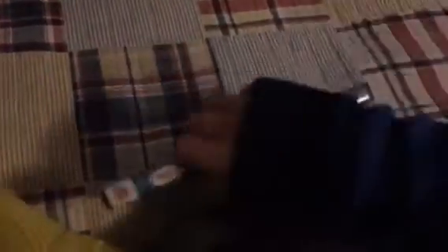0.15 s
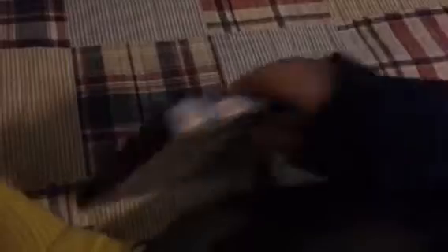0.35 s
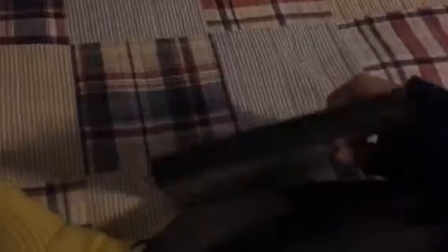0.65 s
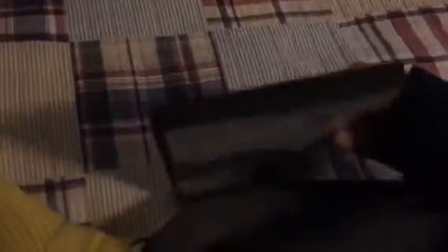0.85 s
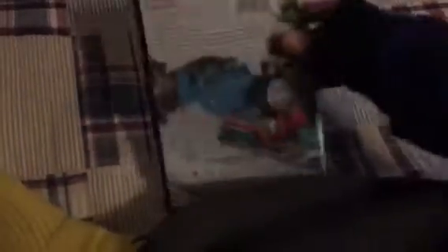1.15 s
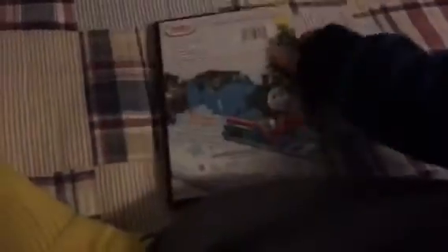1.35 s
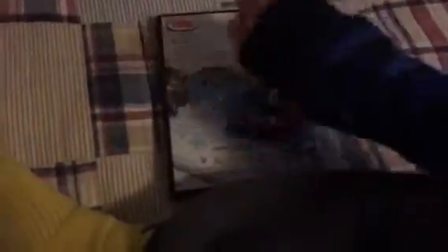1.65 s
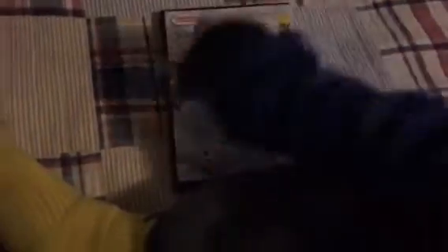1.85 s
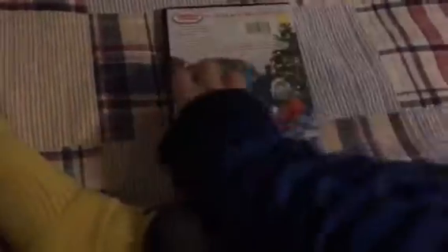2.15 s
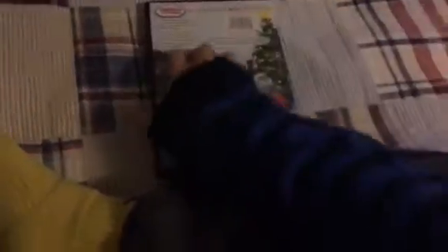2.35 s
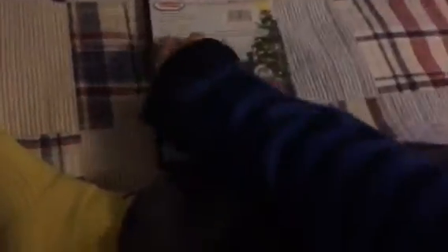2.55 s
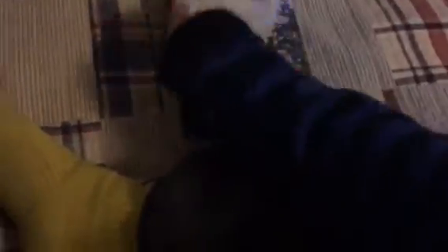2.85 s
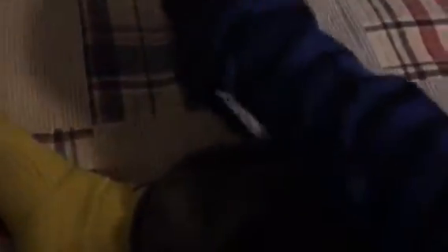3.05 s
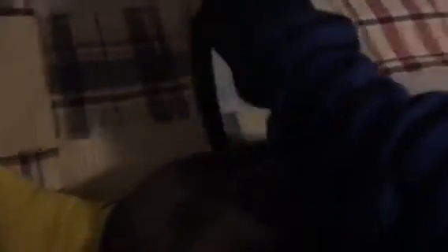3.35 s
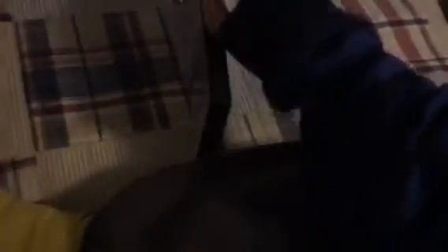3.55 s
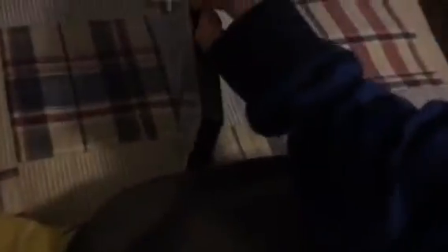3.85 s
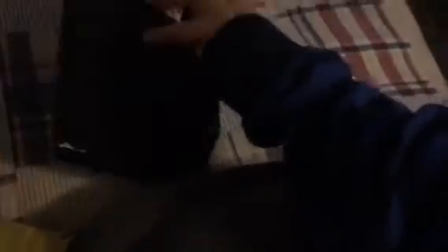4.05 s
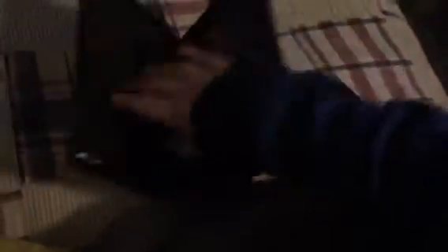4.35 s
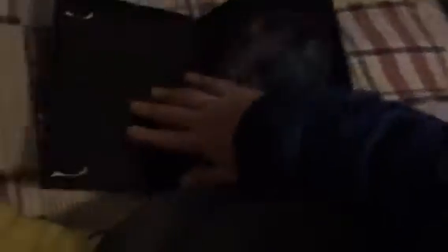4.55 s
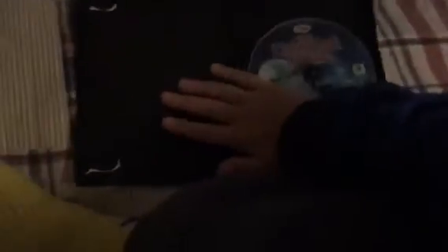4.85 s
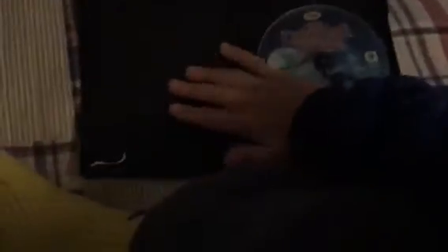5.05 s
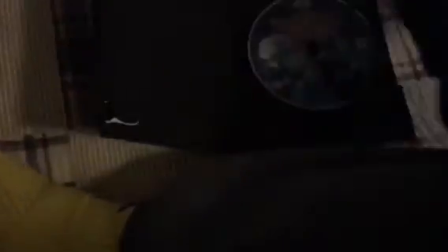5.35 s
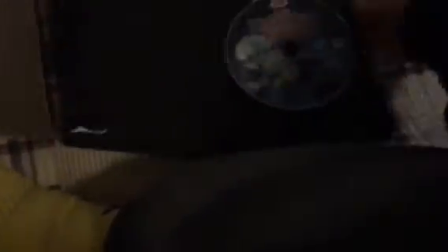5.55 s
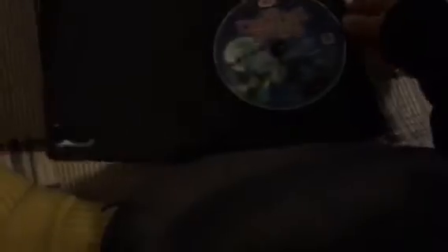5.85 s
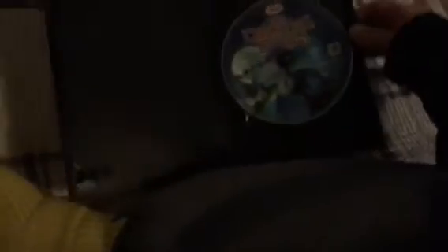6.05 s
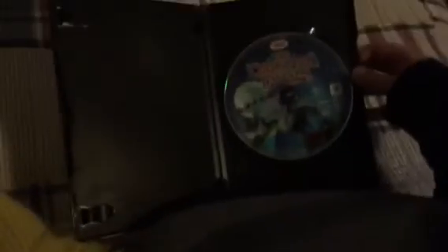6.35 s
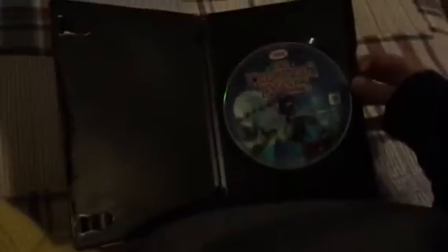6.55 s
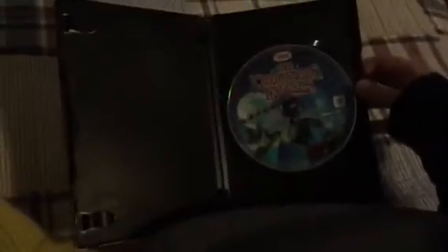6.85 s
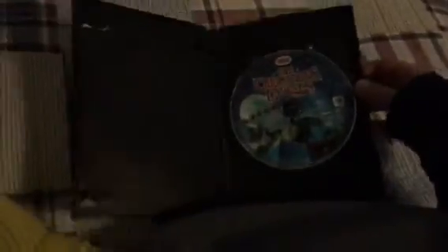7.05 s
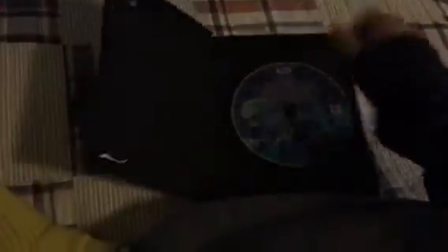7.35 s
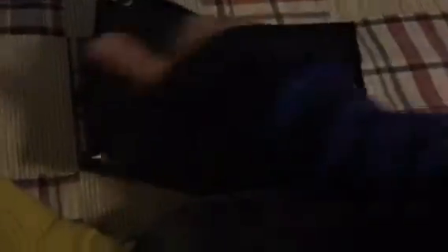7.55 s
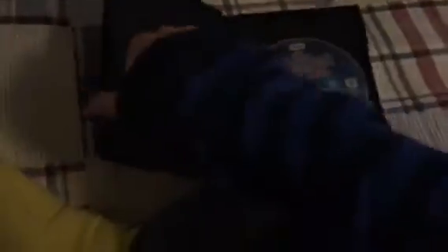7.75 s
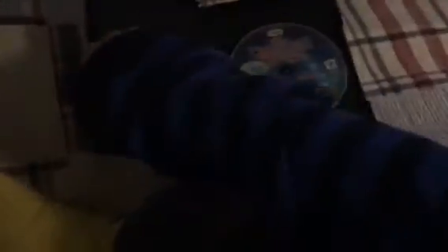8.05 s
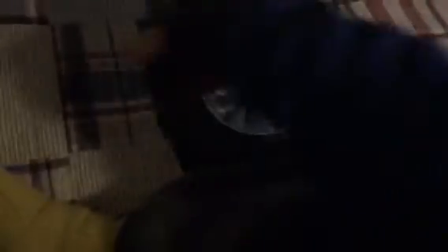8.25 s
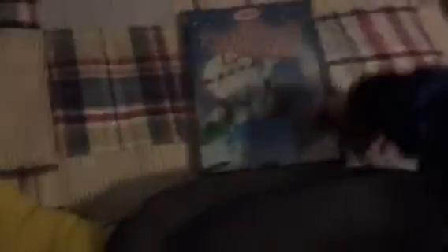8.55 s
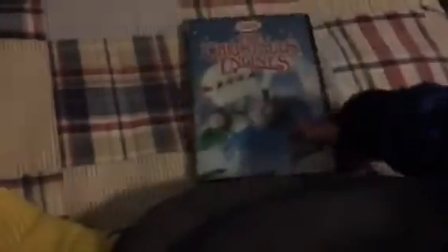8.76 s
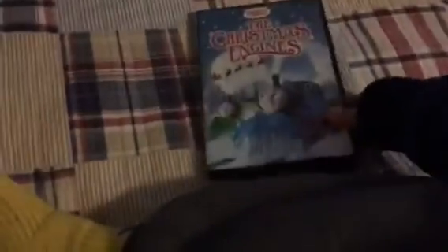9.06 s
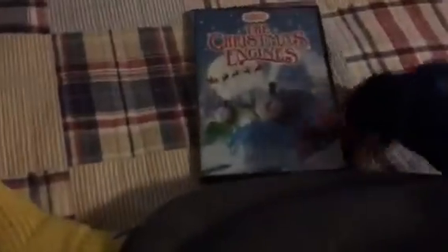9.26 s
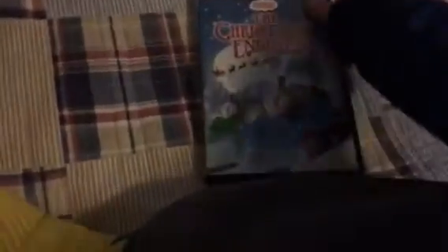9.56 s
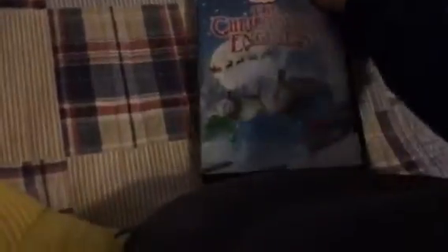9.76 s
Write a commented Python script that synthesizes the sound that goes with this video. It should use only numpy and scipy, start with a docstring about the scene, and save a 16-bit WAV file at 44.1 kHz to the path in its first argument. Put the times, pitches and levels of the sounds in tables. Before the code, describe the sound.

Close, quiet handling of a hollow plastic case: faint rubs and creaks, a loud rattling snap open, sparse ticks, then two crisp closing clicks.

```python
"""A hand turns a thin plastic disc case on a quilt, close by in a small quiet bedroom.
From the start: low rumble and hiss (shaped noise), sleeve rustle and quilt (noise under strokes).
The case ticks and creaks (noise bursts ringing modes), skin rubs it, its panels thump (decaying sines).
Near 4 s it snaps open, after 9 s it clicks shut; a short noise tail follows the loud snaps."""
import sys
import numpy as np
from scipy import signal
from scipy.fft import rfft, irfft, next_fast_len
from scipy.io import wavfile
from scipy.ndimage import uniform_filter1d

SR = 44100
rng = np.random.default_rng(int(sys.argv[2]) if len(sys.argv) > 2 else 0)


def waveform_to_disk(signal):
    """Save audio, clipped to [-1, 1], as 16-bit WAV at the path in sys.argv[1]."""
    frames = np.transpose(np.atleast_2d(signal))
    scaled = np.clip(frames, -1, 1) * 32767
    samples = np.round(scaled).astype(np.int16)
    wavfile.write(sys.argv[1], SR, samples)


def decibels_to_gain(level_db):
    """Convert a level in decibels to a linear amplitude gain (20 dB per decade)."""
    exponent = np.asarray(level_db, float) / 20
    return 10 ** exponent


N = 436590


def colour(x, points):
    """Filter by (hz, level_db) points joined on a log-frequency axis."""
    hz, level_db = np.transpose(points)
    size = next_fast_len(len(x))
    bin_hz = np.maximum(np.arange(size // 2 + 1) * SR / size, 1)
    gain = decibels_to_gain(np.interp(np.log(bin_hz), np.log(hz), level_db))
    return irfft(rfft(x, size) * gain, size)[:len(x)]


def unit(x):
    """Scale to rms 1."""
    return x / np.sqrt(np.mean(x ** 2))


def walk(rate_hz):
    """Random levels held 1 / rate_hz and slewed twice; spread near 1."""
    hold = int(SR / rate_hz)
    steps = np.repeat(rng.standard_normal(N // hold + 1), hold)
    return 1.3 * uniform_filter1d(uniform_filter1d(steps, hold), hold)[:N]


def add(out, start_s, sound, peak_db):
    """Lay a sound in at start_s, scaled to peak_db."""
    i = int(start_s * SR)
    part = sound[:N - i]
    out[i:i + len(part)] += part * decibels_to_gain(peak_db) / np.max(np.abs(sound))


def grains(per_s, spread_db):
    """Tiny slips of fibre or skin: sparse clicks of uneven, bounded size."""
    count = int(per_s * N / SR)
    size_db = spread_db * np.minimum(rng.exponential(size=count), 3)
    out = np.zeros(N)
    out[rng.integers(0, N, count)] = rng.standard_normal(count) * decibels_to_gain(size_db)
    return out


def strokes(rows):
    """Gain of hand movements that swell, hold and fade; rows: centre_s, length_s, level_db."""
    edge_steepness = 11
    t = np.arange(0, N + 64, 64) / SR
    gain = sum(decibels_to_gain(level_db) * np.exp(-np.abs((t - centre_s) / (length_s / 2)) ** edge_steepness)
               for centre_s, length_s, level_db in rows)
    return np.repeat(gain, 64)[:N]


# rumble and hiss spectrum: hz, density_db [dB per Hz]
QUIET_SPECTRUM = [(15, -41.5), (25, -4), (74, -4.5), (114, -22.5), (190, -15), (405, -35.5), (659, -28.5),
                  (714, -34), (16000, -50)]


def background():
    """Low house rumble and microphone hiss: steady shaped noise."""
    return unit(colour(rng.standard_normal(N), QUIET_SPECTRUM)) * decibels_to_gain(-67)


# skin and sleeve sweeps over cloth: centre_s, length_s, level_db
BRUSHES = [(.08, 0.38, -71.5), (.4, 0.28, -79), (0.688, 0.13, -78), (1.197, 0.41, -77.5),
           (1.547, 0.31, -78), (1.78, 0.16, -69.5), (2.11, 0.16, -72.5), (3.19, 0.68, -82),
           (3.598, 0.029, -62), (4.253, 0.038, -55), (4.39, 0.018, -58), (4.47, 0.3, -61.5),
           (4.72, 0.12, -66.5), (4.86, 0.36, -73), (5.15, 0.055, -63), (5.55, 0.346, -75.5),
           (6.148, 0.66, -80.5), (7.551, 0.13, -75.5), (8.297, 0.21, -82.5), (8.469, 0.033, -67),
           (8.563, 0.03, -68.5), (8.55, 0.14, -75.5), (8.785, 0.28, -78.5), (9.396, 0.64, -69)]
# cloth hiss spectrum: hz, density_db [dB per Hz]
RUSTLE_SPECTRUM = [(880, -29), (1500, -2), (4920, -5.5), (6760, -5), (13800, -12), (16000, -17)]


def brush_gain():
    """Sweep strokes over the faint level of the hand at rest."""
    return decibels_to_gain(-81.5) + strokes(BRUSHES)


def rustle():
    """Skin and sleeve hiss: noise and fibre grains under the sweeps."""
    fibres = rng.standard_normal(N) + grains(580, 2.2)
    return unit(colour(fibres, RUSTLE_SPECTRUM)) * brush_gain() * decibels_to_gain(walk(23))


# quilt spectrum: hz, density_db [dB per Hz]
QUILT_SPECTRUM = [(45, -3.5), (100, -7.5), (200, -12), (400, -14.5), (800, -39.5)]
QUILT_DB, QUILT_DB_PER_DB = -69.5, 0.5  # level under a -71 dB movement, and its growth
QUILT_AFTER_THUMP_DB, SETTLE_S = -26, 0.086


def quilt():
    """The quilt gives way under sweeps and rubs, and settles after thumps."""
    movement = brush_gain() + strokes(row[:3] for row in RUBS)
    movement = uniform_filter1d(movement, size=SR // 8)
    blows = np.zeros(N)
    for start_s, peak_db, pitch_hz in THUMPS:
        # deep thumps press most
        blows[int(start_s * SR)] += decibels_to_gain(peak_db + QUILT_AFTER_THUMP_DB - 3.8 * np.log2(pitch_hz / 100))
    settle = signal.lfilter([1], [1, -np.exp(-1 / (SETTLE_S * SR))], blows)
    press = decibels_to_gain(QUILT_DB) * (movement / decibels_to_gain(-71)) ** QUILT_DB_PER_DB + settle
    flutter = decibels_to_gain(4.5 * walk(14) + walk(3))
    return unit(colour(rng.standard_normal(N), QUILT_SPECTRUM)) * press * flutter


# case modes before grip and scatter: mode_hz, level_db, t60_s
CASE_MODES = [(623, -4, 0.025), (1050, -6.5, 0.018), (1280, -9, 0.012), (1596, -8, 0.0089),
              (1885, -10, 0.016), (2100, -6.5, 0.015), (2500, -11, 0.011), (3060, -9.5, 0.018),
              (3300, -5, 0.011), (3700, 2, 0.017), (4660, -8.5, 0.0039)]
RING_OCTAVES, MODE_SCATTER_DB, MODE_DRIFT = 0.95, 3, 0.02  # drift as a fraction of mode_hz
RIM_LOW_HZ, RIM_HIGH_HZ = 3150, 4000


def ring(centre_hz, octaves=RING_OCTAVES, rim_db=0):
    """The case answers one push; the grip favours modes near a centre and shifts them a little."""
    t = np.arange(2048) / SR
    mode_hz, level_db, t60_s = np.transpose(CASE_MODES)[:, :, None]
    level_chance, pitch_chance = rng.standard_normal((2, len(CASE_MODES), 1))
    near_db = -6 * (np.log2(mode_hz / centre_hz) / octaves) ** 2
    near_db = near_db + rim_db * ((mode_hz > RIM_LOW_HZ) & (mode_hz < RIM_HIGH_HZ))
    gain = decibels_to_gain(level_db + near_db + MODE_SCATTER_DB * level_chance)
    shifted_hz = mode_hz * (1 + MODE_DRIFT * pitch_chance)
    modes = np.sum(gain * decibels_to_gain(-60 * t / t60_s) * np.sin(2 * np.pi * shifted_hz * t), axis=0)
    # a small thin panel radiates almost no bass
    return signal.sosfilt(signal.butter(4, 560, "high", fs=SR, output="sos"), modes)


# slips and snaps of the plastic: start_s, ring_peak_db, centre_hz, slip_ms (played within 1-20)
CLICKS = [(0.008, -48, 1330, 5.1), (0.119, -49.5, 1030, 8.9), (0.1977, -40, 2700, 5.4),
          (0.215, -47.5, 1040, 18), (0.344, -51.5, 3340, 24), (0.634, -46.5, 1930, 6),
          (0.66, -42, 2440, 19), (0.6984, -43.5, 2310, 11.4), (0.7932, -47.5, 1250, 4.2),
          (1.284, -52, 1100, 3.2), (1.0641, -40.5, 1860, 8.6), (1.146, -43, 2060, 2.6),
          (1.233, -51, 1220, 3), (1.3785, -45.5, 1420, 4.2), (1.3894, -45, 1830, 2.9),
          (1.4551, -29.5, 1460, 6), (1.4794, -42, 1540, 2.6), (1.4967, -30.5, 1800, 5.4),
          (1.5253, -38, 1300, 2.9), (1.537, -30, 2080, 2.3), (1.566, -50, 1710, 3),
          (1.579, -31.5, 1750, 2.1), (1.6103, -39.5, 1180, 6), (2.3166, -48, 1320, 7),
          (2.344, -41.5, 1310, 2.3), (3.25, -44.5, 1260, 8.7), (3.427, -50.5, 1110, 3),
          (3.586, -51.5, 2800, 8.1), (3.615, -49.5, 1890, 22), (4.0476, -11, 2100, 1.9),
          (4.0507, -11.5, 1290, 8), (4.062, -17.5, 2320, 2.1), (4.068, -14, 2130, 3.6),
          (4.0716, -9.5, 2100, 5.2), (4.082, -11.5, 2400, 2.9), (4.0944, -19, 1540, 3.8),
          (4.1723, -35, 2020, 1.8), (4.2519, -37.5, 2100, 5.2), (4.302, -41, 1060, 3.5),
          (4.349, -38, 9100, 1.8), (4.349, -44.5, 900, 3), (4.387, -45.5, 1050, 12),
          (4.4239, -34, 9100, 1.2), (4.424, -34, 1600, 11), (4.4902, -39.5, 1300, 8.6),
          (4.9447, -51, 879, 6.2), (5.1947, -54, 1415, 2.4), (5.363, -50.5, 1200, 3.7),
          (5.6096, -37.5, 6990, 1.3), (5.611, -33, 1490, 4.9), (5.617, -36, 2000, 6.7),
          (5.6246, -32.5, 1590, 2.2), (5.636, -41.5, 1900, 7.6), (7.2295, -38.5, 1773, 1.95),
          (7.257, -46, 2500, 2.6), (7.269, -48, 1150, 3.3), (7.2833, -37, 1425, 4.1),
          (7.3943, -52, 1300, 2), (7.414, -48.5, 1243, 6.7), (7.802, -55.5, 1210, 2.9),
          (7.8269, -46, 1700, 7.9), (7.899, -53, 1208, 2.45), (8.2263, -48, 1633, 5.4),
          (8.403, -45, 1465, 3.5), (8.416, -48.5, 2420, 4.6), (8.788, -52.5, 1120, 7),
          (8.8688, -40, 1395, 4.4), (8.999, -46, 1210, 3.1), (9.073, -3.5, 1600, 2.6),
          (9.0832, -18.5, 1360, 7.4), (9.0963, -21, 1850, 4.5), (9.7821, -51, 1384, 2.2),
          (9.81, -46, 1170, 3.2), (9.8752, -43.5, 1540, 3), (9.8979, -6.5, 1900, 3.4)]
# crack spectrum: hz, density_db [dB per Hz]
CRACK_SPECTRUM = [(600, -14), (2500, -5), (6000, 4.5), (13000, -8), (17000, -17)]
CRACK_DB, CRACK_DB_PER_DB, CRACK_DB_PER_OCTAVE = 3, 0.58, 5  # harder, higher slips are brighter
SLIP_SHAPE = 2.1  # 1 = falls at once, 2 = holds a moment
OPENS_S, OPEN_RIM_DB, OPEN_OCTAVES = 4.04, -13, 0.8  # unlatched: weaker rim, fewer modes
TAIL_DB_PER_DB = 0.05  # the tail grows faster than the snap


def fullness(x):
    """Root energy over peak."""
    return np.sqrt(np.sum(x ** 2)) / np.max(np.abs(x))


def clicks():
    """Sparse uneven pushes ring the case, plus a bright crack; also returns toneless jolts for the tail."""
    out, stir, t = np.zeros(N), np.zeros(N), np.arange(2048) / SR
    for start_s, ring_peak_db, centre_hz, slip_ms in CLICKS:
        crack_db = ring_peak_db + CRACK_DB + CRACK_DB_PER_DB * ring_peak_db
        crack_db += CRACK_DB_PER_OCTAVE * np.log2(centre_hz / 1700)
        body_noise, crack_noise = rng.standard_normal((2, len(t)))
        slip_s = np.clip(slip_ms, 1, 20) / 1000
        rise = 1 - np.exp(-t / (0.11 * slip_s))  # long scrapes start softer
        slip = rise * np.exp(-(t / slip_s) ** SLIP_SHAPE)
        if start_s > OPENS_S:
            answer = ring(centre_hz, OPEN_OCTAVES, OPEN_RIM_DB)
        else:
            answer = ring(centre_hz)
        body = signal.fftconvolve(answer, body_noise ** 3 * slip)
        crack = colour(crack_noise ** 3, CRACK_SPECTRUM) * slip
        add(out, start_s, body, ring_peak_db)
        add(out, start_s, crack, crack_db)
        # match the ring's energy; hard snaps shake the lid more
        jolt = crack_noise * slip
        match_db = 20 * np.log10(fullness(body) / fullness(jolt))
        add(stir, start_s, jolt, ring_peak_db * (1 + TAIL_DB_PER_DB) + match_db)
    return out, stir


# tail colour: hz, level_db
ROOM_COLOUR = [(350, -35), (780, -9.5), (1080, 0.5), (1400, -6.5), (1950, -3), (2800, -7), (5500, -11.5),
               (14000, -22.5)]
ROOM_T60_S, ROOM_TREBLE_T60_S, ROOM_DB, ROOM_GAP_S = 0.29, 0.21, -9.5, 0.002


def room(stir):
    """Walls, bedding and loose lid answer with a short, dense, rattly tail whose treble dies first."""
    t = np.arange(SR // 2) / SR
    noise = colour(rng.standard_normal(len(t)), ROOM_COLOUR)
    low = signal.sosfilt(signal.butter(2, 3000, fs=SR, output="sos"), noise)
    tail = low * decibels_to_gain(-60 * t / ROOM_T60_S) + (noise - low) * decibels_to_gain(-60 * t / ROOM_TREBLE_T60_S)
    rattle = decibels_to_gain(1.3 * walk(280)[:len(t)])
    tail = tail * rattle * np.clip(t / ROOM_GAP_S, 0, 1) ** 2
    return signal.fftconvolve(stir, tail / np.sqrt(np.sum(tail ** 2)))[:N] * decibels_to_gain(ROOM_DB)


# fingers slide on the case: centre_s, length_s, level_db, part_hz (part of the case that rings)
RUBS = [(0.156, 0.27, -73.5, 1370), (0.424, 0.25, -70, 2780), (0.676, 0.17, -65, 2230),
        (1.17, 0.56, -73, 1580), (1.529, 0.14, -50.5, 1490), (1.734, 0.31, -69.5, 2610),
        (2.092, 0.46, -77.5, 610), (2.094, 0.41, -71.5, 2090), (2.733, 0.68, -77, 1330),
        (3.099, 0.14, -66, 1050), (3.24, 0.049, -62.5, 3150), (3.373, 0.27, -75.5, 920),
        (3.647, 0.33, -73, 2100), (4.159, 0.25, -58.5, 1130), (4.423, 0.23, -61.5, 1050),
        (4.779, 0.44, -63, 1990), (5.493, 0.6, -76.5, 1518), (7.325, 0.31, -72.5, 1595),
        (7.552, 0.15, -74, 2500), (8.168, 0.36, -85, 646), (8.189, 0.36, -71, 1770),
        (8.465, 0.25, -73.5, 1190), (8.81, 0.27, -72, 1400), (9.319, 0.4, -66.5, 1554),
        (9.657, 0.15, -71.5, 1610), (9.834, 0.28, -77.5, 1393)]
# parts of the case under the fingers: part_hz, level_db
RUB_PARTS = [(620, 4.5), (1050, -3), (2000, -3.5), (3400, -4.5)]
REST_RUB_DB, RUB_OCTAVES = -80, 0.55  # hand at rest (halved per part); reach of the fingers
JERK_DB, JERKS_PER_S = 3.5, 45
TAPS_PER_S, TAP_DB = 30, 17  # small catches of nail and skin
SKIN_DAMP_S = 0.008  # skin on the panel shortens the ring


def rub():
    """Fine skin slips stir the hand-damped case near the fingers; each part comes and goes in jerks."""
    out, damping = np.zeros(N), np.exp(-np.arange(2048) / SR / SKIN_DAMP_S)
    for hz, part_db in RUB_PARTS:
        taps = decibels_to_gain(TAP_DB) * grains(TAPS_PER_S, 3)
        slips = rng.standard_normal(N) + 1.8 * grains(300, 5) + taps
        near = strokes((centre_s, length_s, level_db - 6 * (np.log2(hz / part_hz) / RUB_OCTAVES) ** 2)
                       for centre_s, length_s, level_db, part_hz in RUBS)
        body = unit(signal.fftconvolve(slips, ring(hz, 0.51) * damping)[:N])
        jerks = decibels_to_gain(part_db + JERK_DB * walk(JERKS_PER_S))
        out += (decibels_to_gain(REST_RUB_DB) / 2 + near) * jerks * body
    return out


# low thumps of the hollow panels, from knocks and under the snaps: start_s, peak_db, pitch_hz
THUMPS = [(0.692, -39, 79), (1.448, -41.5, 46.6), (1.456, -41.5, 200), (1.54, -52, 47.7), (1.577, -49, 228),
          (2.607, -52.5, 56), (4.051, -22, 114.3), (4.07, -31, 47), (4.069, -33.5, 246.5),
          (4.047, -26.5, 332), (4.349, -43, 119), (4.592, -54, 91), (4.941, -46, 107), (5.479, -47.5, 112),
          (5.607, -42, 94), (5.61, -38.5, 330), (5.622, -43.5, 240), (7.224, -40.5, 61.5),
          (7.394, -50, 420), (7.421, -40.5, 292), (7.4278, -40, 309), (7.796, -48, 71.3),
          (8.215, -44.5, 62), (8.222, -52, 229), (8.393, -41, 200), (8.396, -38.5, 97.4), (8.568, -51, 209),
          (9.071, -39, 254), (9.083, -39, 100.5)]
THUMP_SWELL_CYCLES = 0.76
THUMP_T60_S, THUMP_T60_SLOPE = 0.055, 0.27  # decay at 100 Hz, longer for the stiff higher booms


def thumps():
    """Low thumps of the hollow panels, from knocks and under the snaps: two sines swell and die fast."""
    out, t = np.zeros(N), np.arange(SR // 4) / SR
    for start_s, peak_db, pitch_hz in THUMPS:
        swell = 1 - np.exp(-(t * pitch_hz / THUMP_SWELL_CYCLES) ** 2)
        t60_s = THUMP_T60_S * (pitch_hz / 100) ** THUMP_T60_SLOPE
        boom = np.sin(2 * np.pi * pitch_hz * t) + 0.36 * np.sin(2 * np.pi * 1.9 * pitch_hz * t)
        add(out, start_s, swell * decibels_to_gain(-60 * t / t60_s) * boom, peak_db)
    return out


def scene():
    """Case and hand close by, the room behind them."""
    plastic, stir = clicks()
    hand = rustle() + quilt() + rub()
    return (background() + hand + plastic + room(stir) + thumps())[None]


def top_cut(x):
    """Nothing passes above the cut-off."""
    return signal.sosfilt(signal.butter(12, 16000, fs=SR, output="sos"), x)


def record(dry):
    """The phone cuts the deepest bass."""
    mix = signal.sosfilt(signal.butter(4, 42, "high", fs=SR, output="sos"), dry)
    return top_cut(mix)


dry = scene()
out = record(dry)
waveform_to_disk(out)
```